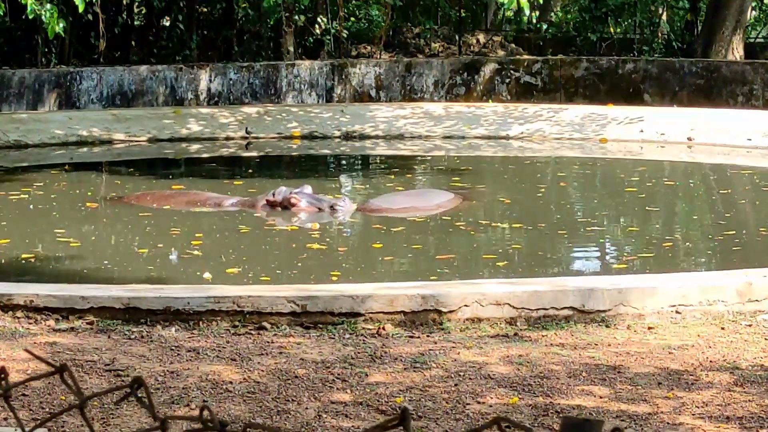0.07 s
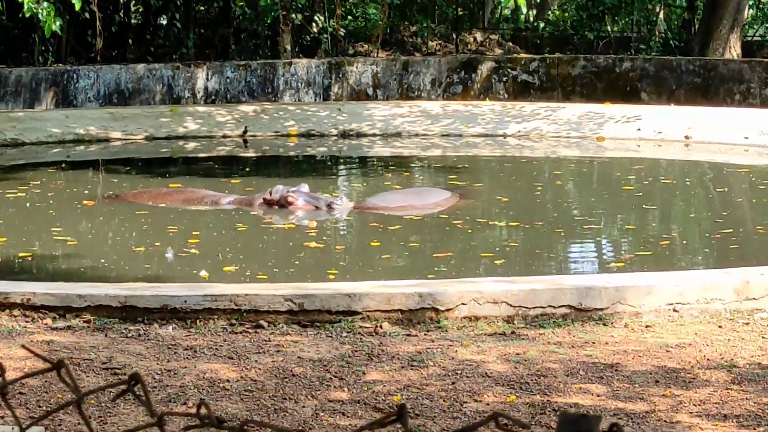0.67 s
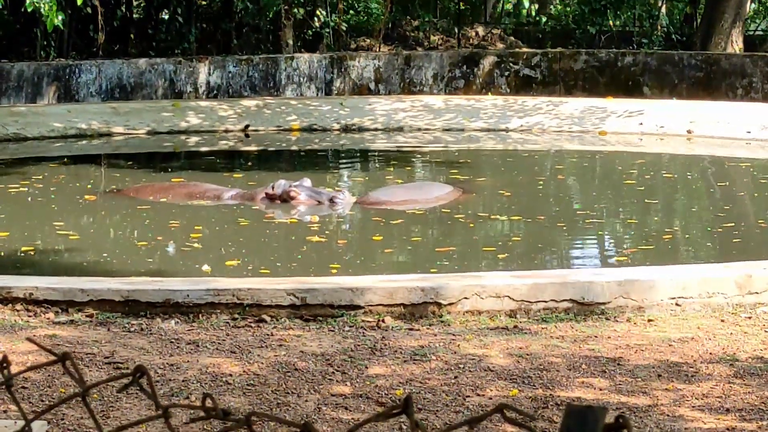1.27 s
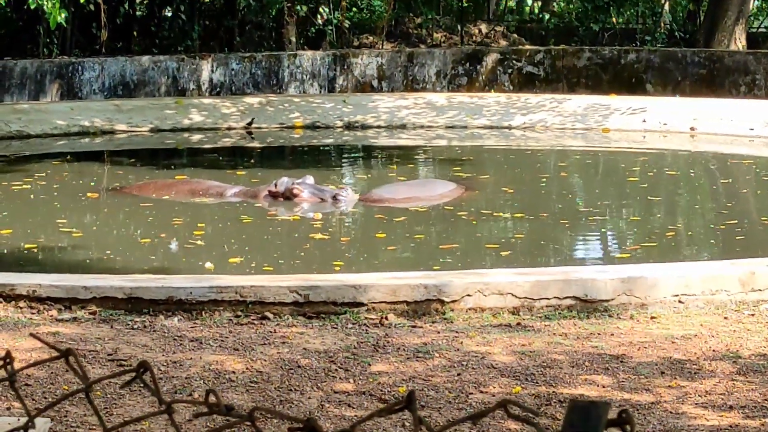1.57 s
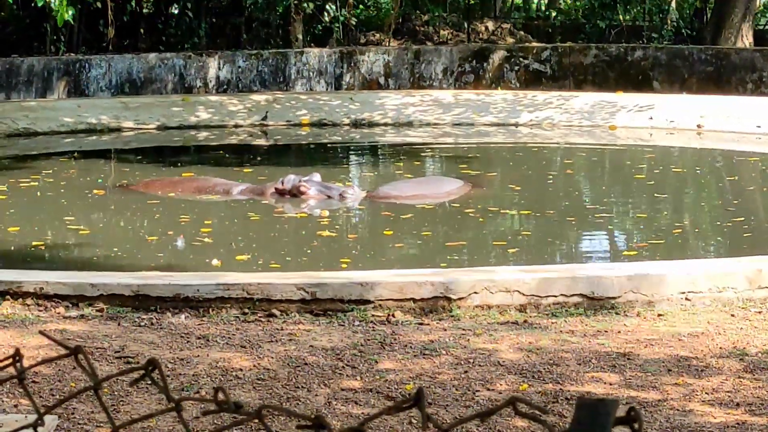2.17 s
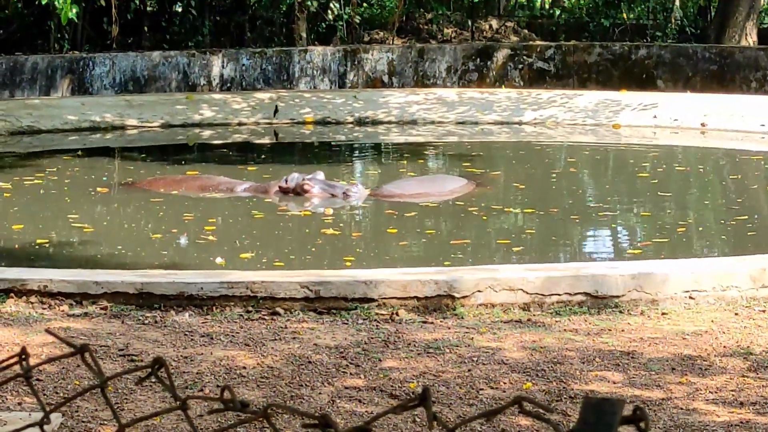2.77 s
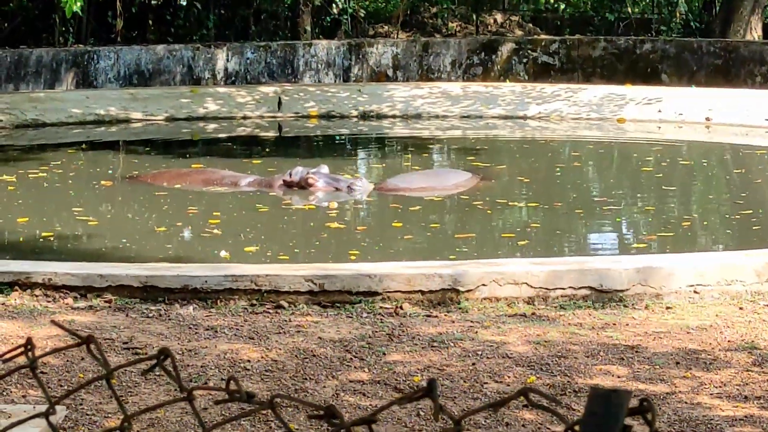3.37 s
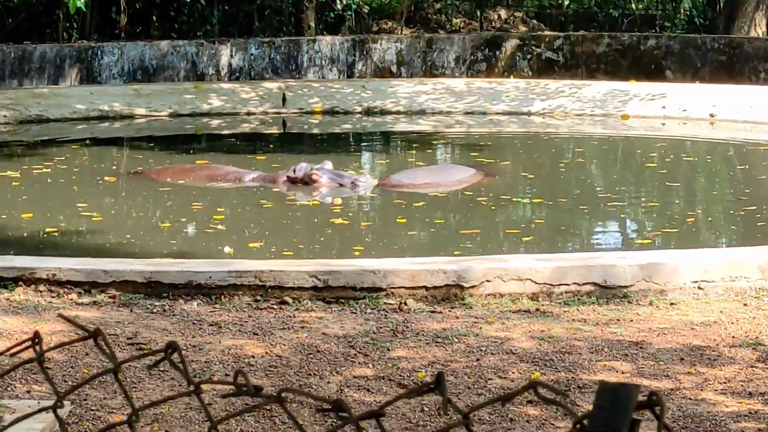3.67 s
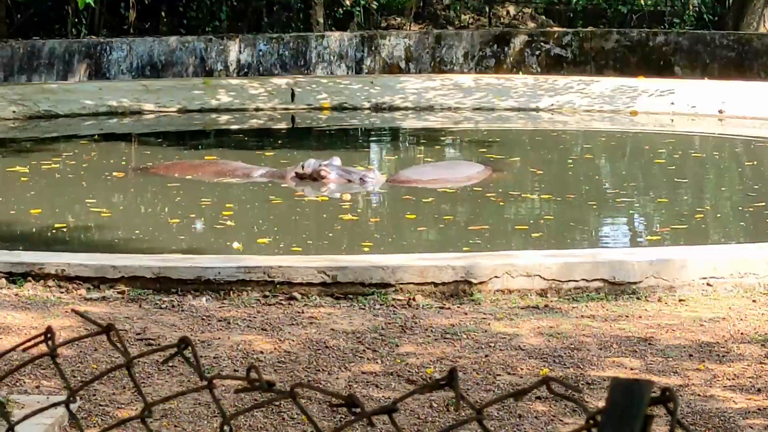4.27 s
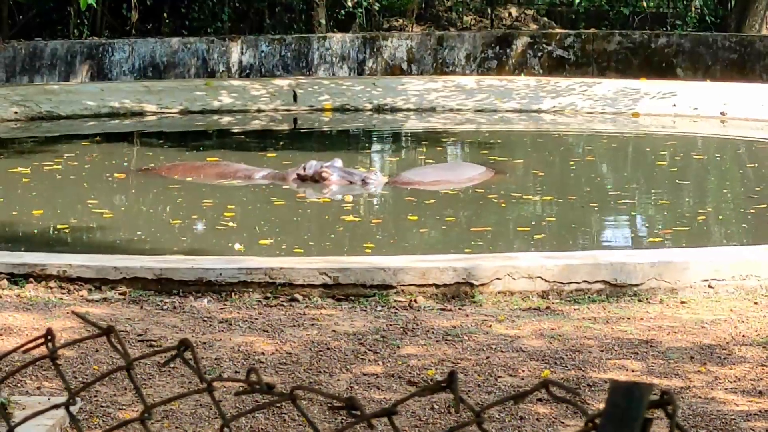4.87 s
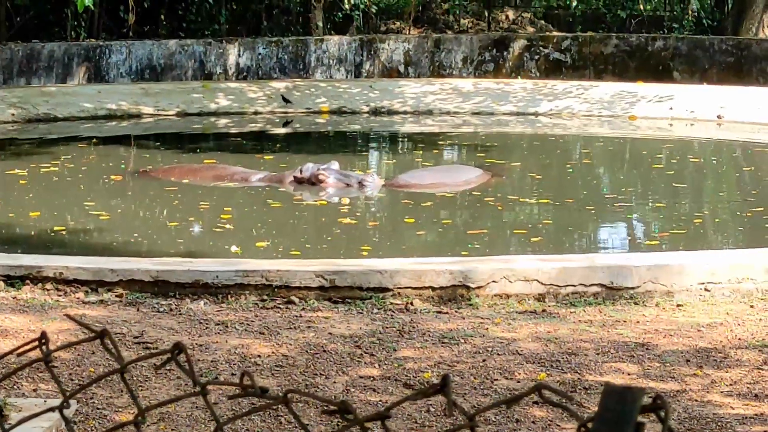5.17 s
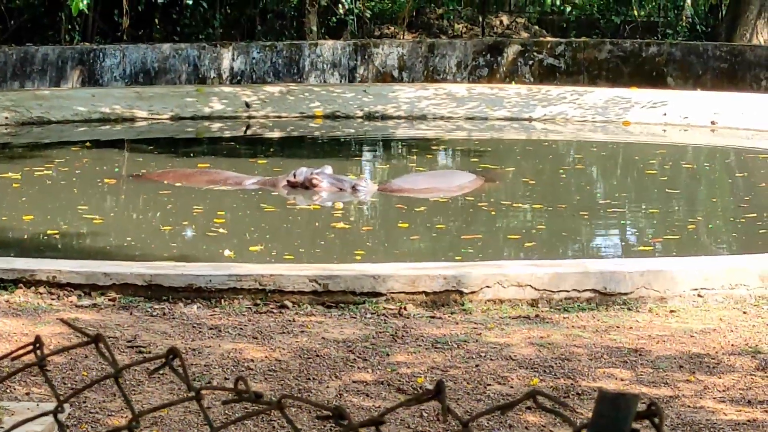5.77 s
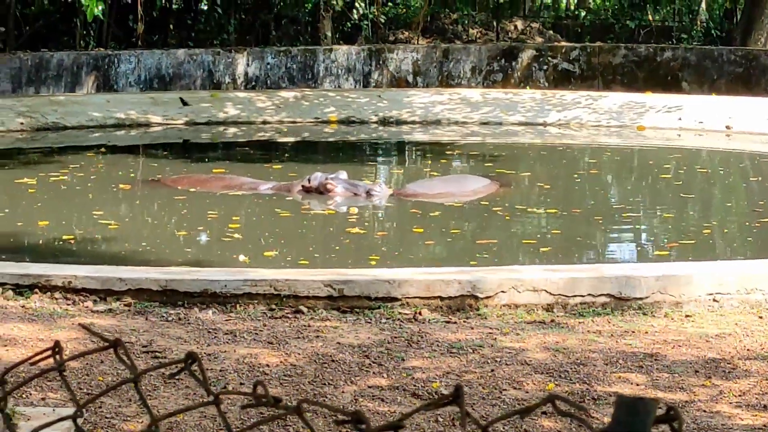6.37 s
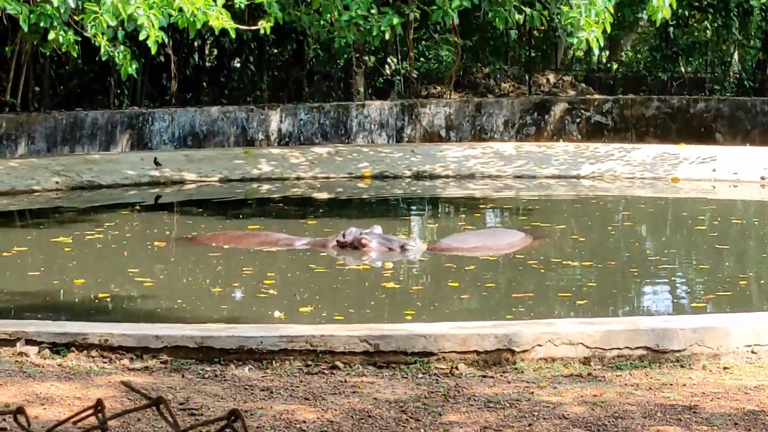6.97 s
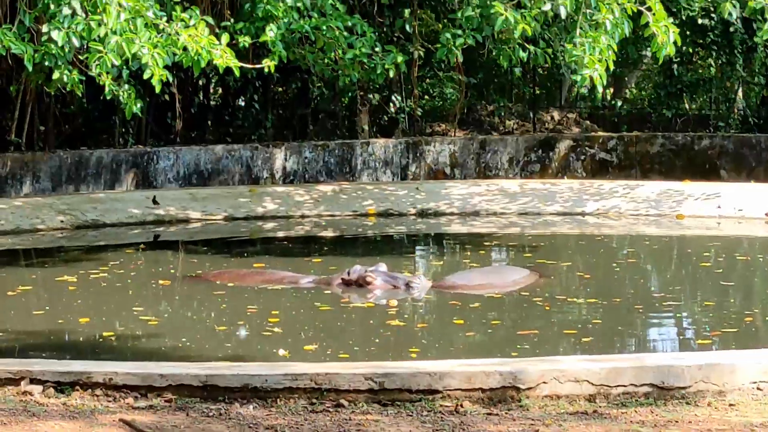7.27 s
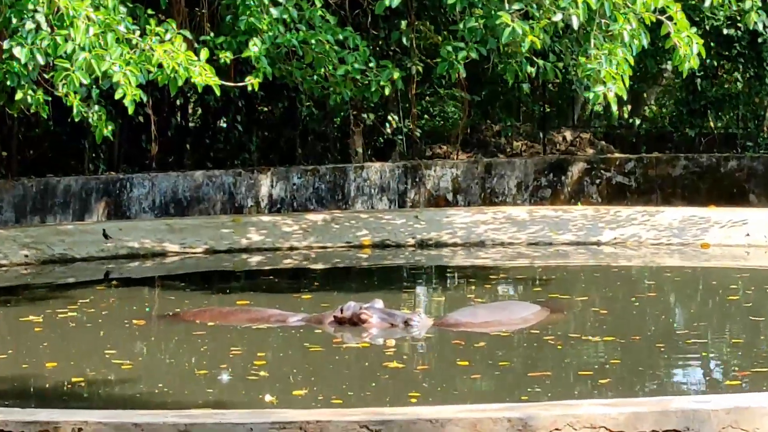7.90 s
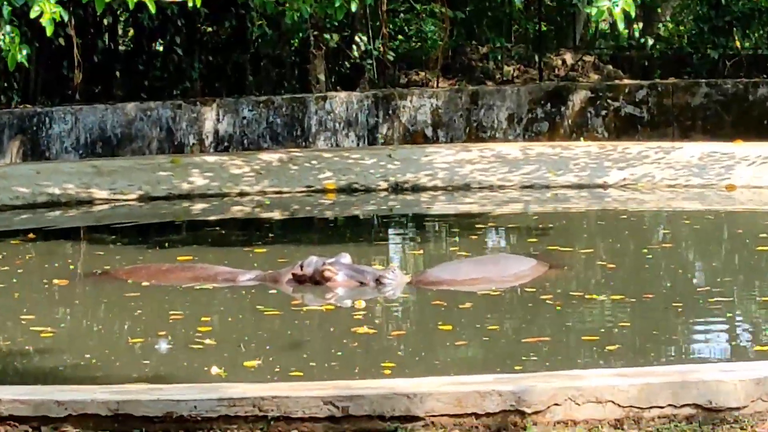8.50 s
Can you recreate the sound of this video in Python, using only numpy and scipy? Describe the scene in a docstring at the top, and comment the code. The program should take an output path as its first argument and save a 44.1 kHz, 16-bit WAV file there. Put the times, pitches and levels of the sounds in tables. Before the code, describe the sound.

Outdoors among trees, a distant engine hums under a light hiss. A far bird whistles short, echoing phrases on the right, with faint high chirps and an occasional crow-like caw. Midway, a small bird trills quickly on the left. Near the end, a songbird close to the microphone scolds, squawks and squeaks, then breaks into loud, fast chatter that dominates everything else.

```python
"""Birds around a walled pool

Over a distant engine and faint chirps, a far bird whistles short phrases, a small one trills and a
crow-like caw comes now and then; then a near songbird scolds and breaks into loud, fast chatter.
Each whistle is a gliding tone of the syrinx, roughened by modulation; caws and engine hum are harmonic
series shaped by resonance. Outdoors, trees and walls scatter every note into reverberation."""
import sys
import numpy as np
from scipy import signal
from scipy.fft import rfft, irfft
from scipy.io import wavfile
from scipy.ndimage import uniform_filter1d

SR = 44100
rng = np.random.default_rng(int(sys.argv[2]) if len(sys.argv) > 2 else 0)


def put_to_file(sound):
    """Save the sound as 16-bit audio at rate SR, in the file named by the first command-line argument."""
    columns = np.atleast_2d(sound).T  # one column per channel
    safe = np.clip(columns, -1, 1)
    whole_steps = np.round(safe * 32767)
    wavfile.write(sys.argv[1], SR, whole_steps.astype(np.int16))


N = 385434
RUMBLE_DB, HISS_DB = -47, -51
BAND_LIMIT_HZ = 15850

# Levels in the tables are relative; rasp is a depth of modulation, from 0 (pure) to 1 (harsh).
# Far-off rumble: (frequency [Hz], spectral density [dB])
RUMBLE_SPECTRUM = [(15, -57), (25, -34), (54, -15.5), (91, -0.5), (108, 0), (174, -4.5), (211, -8),
                   (270, -13), (344, -16.5), (400, -43), (520, -39), (880, -120)]
# Outdoor hiss: (frequency [Hz], spectral density [dB])
HISS_SPECTRUM = [(180, -8.5), (300, -7), (342, -0.5), (611, -7), (956, -8.5), (1710, -13.5), (2460, -12),
                 (4170, -12.5), (4770, -8), (6310, -15.5), (9550, -18), (14900, -16), (15700, -18.5)]
# Likeness of the noise on the two sides: (frequency [Hz], correlation [-1 to 1])
NOISE_CORRELATION = [(60, 0.96), (130, 0.59), (290, 0.39), (640, 0.25), (1410, 0.11), (3100, -0.24),
                     (6820, -0.11), (15000, 0.07)]
# Balance of the noise: (frequency [Hz], left over right [dB])
NOISE_BALANCE = [(60, -11), (110, -6), (200, -1.5), (380, -2), (700, -0.5), (1290, -0.5), (2380, 1.5),
                 (4400, -0.5), (8120, 0.5), (15000, 0.5)]
# Decay among trees and walls: (frequency [Hz], reverberation time [s])
GROVE_T60 = [(1000, 0.36), (3000, 1.43), (5000, 1.03), (7400, 1.38), (14000, .3)]
# The engine speeds up and eases off: (time [s], speed [rev/s])
ENGINE_SPEED = [(0, 20.8), (1.2, 23.2), (1.999, 22), (2.801, 25.4), (3.4, 27.3), (4.4, 23.9), (5.199, 26),
                (6, 28.7), (7, 28), (7.9, 29), (8.35, 27), (8.74, 24)]
# Exhaust resonance: (frequency [Hz], level of a harmonic [dB])
EXHAUST_RESPONSE = [(70, -67.5), (88, -60), (105, -48), (135, -57), (170, -58.5), (220, -63.5)]
# Repeated notes, by name:
# (duration [s], peak position [0-1], swell [0 flat, 1 peaked], pitches at even steps [Hz])
SYLLABLE_SHAPES = { "chak": (.052, 0.25, .08, [4080, 4250, 3290, 3416, 2936, 2900, 2855, 3070, 2800]),
                   "rise": (.042, 0.72, 0.64, [3430, 3730, 4220, 3470, 4183, 4220, 4630, 4760, 4620]),
                   "slur": (.032, 0.59, 0.82, [6070, 5160, 5810, 4720, 5204, 4285, 4034, 3650, 3270]),
                   "arch": (.035, 0.32, 0.97, [3190, 3796, 3745, 3320, 2854, 2380]),
                   "hook": (.039, 0.73, .8, [2580, 2384, 2710, 2297, 2717, 3084, 3120, 2020]),
                   "dip": (0.023, 0.32, 1, [3820, 3534, 3050, 2660, 2380]),
                   "lift": (0.0329, 0.68, 0.82, [3410, 3790, 4016, 4234, 4370]),
                   "trill": (.033, .5, 0.23, [6205, 6060, 5580, 5026, 4550, 6480, 7700]),
                   "pip": (0.017, .55, .8, [5660, 5910, 5900, 5670]),
                   "tsip": (0.0217, 0.58, 0.69, [5250, 4820, 4620, 4350])}
# Bouts of triple pips and tsips: (start [s], end [s], period [s], level [dB], syllable [name])
CHIRP_BOUTS = [(.186, .6, 0.3, -55.5, "pip"), (.863, 1.95, .31, -55.5, "pip"),
               (2.42, 4.4, .302, -55.5, "pip"), (6.428, 6.6, .302, -57, "pip"),
               (.05, 4.5, .33, -57.5, "tsip"), (6.461, 6.6, .33, -58, "tsip")]
# Far caws: (time [s], duration [s], pitch [Hz], level [dB])
CAW_NOTES = [(2.677, 0.13, 624, -52.5), (3.25, 0.09, 624, -52.5), (3.964, 0.13, 629, -54),
             (4.581, 0.15, 606.6, -61), (5.532, .13, 638, -52), (5.78, 0.081, 716, -65),
             (6.961, 0.1, 623, -47.5)]
# Throat resonance of the cawing bird: (frequency [Hz], gain [dB])
CAW_FORMANTS = [(600, -31), (1230, -13), (1850, -12.5), (2480, 0), (3100, -16), (4000, -19)]
# Envelope of the small bird's trill: (time [s], level [dB])
TRILL_LEVELS = [(4.42, -54), (4.55, -46), (4.7, -43.5), (5.3, -43.5), (5.8, -44), (6.16, -43.5)]
# Far whistles: (time [s], duration [s], start [Hz], middle [Hz], end [Hz], level [dB], rasp [0-1])
FAR_WHISTLES = [(0.251, .095, 4520, 4600, 4480, -52, 0.23), (0.873, 0.0425, 3340, 2886, 3700, -44, .12),
                (.906, 0.055, 3285, 4680, 5600, -45.5, .25), (0.966, .064, 5600, 5280, 4350, -51, .2),
                (2.013, 0.055, 3620, 3770, 3970, -48, 0.32), (2.279, .06, 2700, 3410, 4980, -44, .15),
                (2.358, .031, 2450, 2334, 2320, -46, 0.27), (2.375, 0.043, 7200, 7540, 7450, -46.5, .3),
                (2.599, .04, 7200, 7460, 7280, -48.5, 0.27), (3.343, 0.083, 3703, 3990, 4150, -45.5, 0.08),
                (4.736, 0.056, 4220, 4430, 4300, -48.5, 0.36)]
# Far warbles: (time [s], duration [s], first centre [Hz], last centre [Hz], swing rate [Hz],
# swing [share of pitch], level [dB], peak position [0-1], rasp [0-1])
FAR_WARBLES = [(0, 0.12, 2500, 2804, 22, .11, -47, 0.32, 0.27),
               (0.137, 0.21, 3870, 3820, 17, .24, -49.5, 0.6, 0.4),
               (1.029, .17, 3150, 3404, 11.5, .21, -42, 0.69, 0.23),
               (1.87, 0.17, 2305, 2250, 19, .09, -58.5, .5, 0.44),
               (2.09, .175, 3350, 2698, 20.2, .16, -41.5, 0.2, 0.18),
               (3.07, 0.15, 4080, 5000, 15, .15, -47.5, .6, 0.38),
               (3.229, 0.14, 3400, 3150, 13.5, .22, -42, 0.62, .3),
               (4.082, 0.19, 3760, 3160, 17.6, .12, -48, 0.58, 0.4),
               (4.739, .13, 2756, 3180, 10, .2, -46.5, 0.81, .18),
               (4.895, 0.17, 2847, 3455, 21, 0.131, -47, .55, .4),
               (5.033, .24, 2894, 2442, 17, .09, -52, 0.47, .35),
               (5.918, 0.079, 4100, 4000, 15, .13, -54, 0.51, 0.34),
               (6.052, 0.16, 3065, 3150, 8, .17, -49, 0.66, .42)]
# Near scolds: (time [s], level [dB], rasp [0-1])
NEAR_SCOLDS = [(6.567, -42, .9), (6.679, -37.5, .7), (6.781, -36, 0.45)]
# Two-voiced squawks: (time [s], duration [s], start [Hz], middle [Hz], end [Hz], level [dB],
# pitch of the second voice [ratio], final rasp [0-1])
NEAR_SQUAWKS = [(6.874, 0.027, 4720, 7000, 6200, -39.5, .68, 0.6),
                (6.892, 0.046, 5800, 4910, 4740, -38, 1.55, 0.7),
                (6.963, 0.045, 7000, 7600, 7575, -40, 0.51, 0.8),
                (7.074, .038, 6900, 6030, 5560, -37, 0.63, 0.9),
                (7.223, 0.049, 7900, 7380, 6150, -34, 0.68, 1),
                (7.277, .041, 7800, 7340, 6100, -33.5, .67, 1),
                (7.403, 0.07, 2900, 4260, 3510, -36, .75, .5)]
# Near squeaks: (time [s], duration [s], start [Hz], middle [Hz], end [Hz], level [dB], rasp [0-1])
NEAR_SQUEAKS = [(7.044, 0.0076, 9200, 6300, 3800, -36, .9), (7.096, .024, 3900, 3490, 2950, -36, 0.33),
                (7.146, 0.043, 3420, 4110, 5000, -34.5, 1), (7.344, 0.015, 4360, 3630, 3640, -31.5, 0.64),
                (7.357, .02, 3470, 3144, 2600, -31, 0.23), (7.491, 0.0214, 3750, 3540, 2790, -29, .25),
                (7.547, 0.045, 9000, 7400, 6800, -34.5, 0.4), (7.575, 0.02, 6880, 6230, 4950, -23.5, .25),
                (7.622, .016, 5600, 6820, 6900, -24, .24), (7.643, .025, 4906, 5800, 3900, -24.5, .35),
                (7.769, .024, 8930, 6280, 4400, -27, 0.4)]
# Notes of each chatter motif, by name: (offset [s], level [dB], rasp [0-1], syllable [name])
CHATTER_MOTIFS = {"wheet": [(0, -18, 0.04, "rise")], "tee-chu": [(0, -17, 0.1, "slur"),
                  (.036, -19.5, 0.03, "arch")], "to-ri-weet": [(0, -25, 0.04, "hook"),
                  (.0577, -25, 0.02, "dip"), (.083, -14.5, .02, "lift")]}
# Runs of a motif: (start [s], repeats [count], period [s], change per repeat [dB], motif [name])
NEAR_CHATTER_RUNS = [(7.687, 2, .121, 1, "wheet"), (7.881, 4, .1043, 0, "tee-chu"),
                     (8.2933, 3, .146, -0.94, "to-ri-weet")]


def gain_of(db):
    """Amplitude grows tenfold for every 20 dB."""
    return 10 ** (np.asarray(db) / 20)


def unit_rms(x):
    """Normalisation to a mean power of one."""
    return x / np.sqrt(np.mean(x ** 2) + 1e-20)


def value_at(points, hz):
    """Interpolation on a logarithmic frequency axis."""
    f, value = np.transpose(points)
    return np.interp(np.log(hz + 1), np.log(f + 1), value)


def waver(size, hz):
    """Low-pass filtering turns white noise into a smooth fluctuation of unit rms."""
    low = signal.butter(2, min(hz, SR / 4), fs=SR, output="sos")
    return unit_rms(signal.sosfilt(low, rng.standard_normal(size + 2048)))[-size:]


def gather(notes):
    """Superposition: (time, sound) pairs add on one track."""
    track = np.zeros(N)
    for s, sound in notes:
        part = track[max(round(s * SR), 0):][:len(sound)]
        part += sound[:len(part)]
    return track


def grove(x, build_s):
    """Scattering by trunks, leaves and walls: a dense echo builds up, then lingers from 3 to 7 kHz."""
    taps = rng.standard_normal((2, SR)) * (rng.random((2, SR)) < 3000 / SR)
    hz, t, spectra = signal.stft(taps, SR, nperseg=256)
    decay = gain_of(-60 * t / value_at(GROVE_T60, hz)[:, None])
    tail = signal.istft(spectra * decay * (1 - np.exp(-t / build_s)), SR, nperseg=256)[1]
    song_band = signal.butter(2, [2500, 5500], "band", fs=SR, output="sos")
    band_gain = np.linalg.norm(signal.sosfilt(song_band, tail), axis=1, keepdims=True)
    tail /= band_gain * np.sqrt(SR / 6000)  # unit power gain in the song band
    return signal.fftconvolve(x[None], tail, axes=1)[:, :N]


def place(x, pan_db, lead_ms, direct_db, echo_db, build_s):
    """Level and time differences (positive favours the left) locate a source; its echo is diffuse."""
    hz = np.fft.rfftfreq(N, 1 / SR)
    right = irfft(rfft(x) * np.exp(-2j * np.pi * hz * lead_ms / 1000), N)
    direct = np.array([x * gain_of(pan_db / 2), right * gain_of(-pan_db / 2)])
    return gain_of(direct_db) * direct + gain_of(echo_db) * grove(x, build_s)


def outdoor_noise(spectrum, patchy_db):
    """Partial coherence: noise with drifting spectral patches, alike on both sides only in the bass."""
    frames, hz = N // 1024 + 5, np.fft.rfftfreq(4096, 1 / SR)
    a, b, c, d, patches = rng.standard_normal((5, frames, len(hz)))
    patches = unit_rms(uniform_filter1d(uniform_filter1d(patches, size=7, axis=0), size=40, axis=1))
    correlation = value_at(NOISE_CORRELATION, hz)
    left = a + 1j * b
    right = correlation * left + np.sqrt(1 - correlation ** 2) * (c + 1j * d)
    lean = gain_of(value_at(NOISE_BALANCE, hz) / 2)
    spectra = np.array([left * lean, right / lean])
    spectra *= gain_of(value_at(spectrum, hz) + patchy_db * patches)
    return unit_rms(signal.istft(spectra.swapaxes(1, 2), nperseg=4096, noverlap=3072)[1][:, :N])


def engine(unsteady=0.22):
    """Harmonics 3 to 7 of the rotation rate glide through the resonance of the exhaust."""
    speed = np.interp(np.arange(N) / SR, *np.transpose(ENGINE_SPEED)) * (1 + 0.0062 * waver(N, 4.4))
    phase = 2 * np.pi * np.cumsum(speed) / SR
    hum = np.zeros(N)
    for k in range(3, 8):
        harmonic = np.sin(k * phase + 2 * np.pi * rng.random()) * (1 + unsteady * waver(N, 5.5))
        hum += gain_of(value_at(EXHAUST_RESPONSE, k * speed)) * unit_rms(harmonic)
    return hum * gain_of([[-2.4], [2.0]])  # left, right


def background():
    """Continuous spectra of rumble and hiss surround the line spectrum of the distant engine."""
    rumble = gain_of(RUMBLE_DB) * outdoor_noise(RUMBLE_SPECTRUM, patchy_db=0.17)
    return rumble + engine() + gain_of(HISS_DB) * outdoor_noise(HISS_SPECTRUM, patchy_db=1.0)


def rough_tone(hz, rasp, jitter=0.0047, overtone_db=-39, rasp_hz=800, buzz_hz=720, buzz=0.51):
    """Modulation adds sidebands to a tone, as when one side of a syrinx buzzes against the other."""
    size = len(hz)
    phase = 2 * np.pi * np.cumsum(hz * (1 + jitter * waver(size, 162.4))) / SR
    buzz_phase = 2 * np.pi * np.cumsum(buzz_hz * (1 + 0.085 * waver(size, 200))) / SR
    noise = waver(size, rasp_hz) + 1j * waver(size, rasp_hz)
    modulation = 0.77 * noise + buzz * (np.cos(buzz_phase) + 0.37 * np.cos(2 * buzz_phase))
    tone = (np.exp(1j * phase) * (1 + rasp * modulation)).real / np.sqrt(1 + 2 * rasp ** 2)
    return tone + gain_of(overtone_db) * np.sin(2 * phase)


def syllable(s, db, pitch_ratio, rasp, name):
    """A tone follows a frequency contour under an envelope that swells and dies."""
    length, peak, swell, path = SYLLABLE_SHAPES[name]
    u = np.linspace(0, 1, int(length * SR))
    glide = uniform_filter1d(np.interp(u, np.linspace(0, 1, len(path)), path), size=90) * pitch_ratio
    skewed = u ** (np.log(.5) / np.log(peak))  # reaches one half at the peak
    return s, gain_of(db) * abs(np.sin(np.pi * skewed)) ** swell * rough_tone(glide, rasp)


def bent_note(s, length, start_hz, middle_hz, end_hz, db, rasp, jitter=0.0085):
    """A parabolic glide through three frequencies, tapered at both ends."""
    u = np.linspace(0, 1, max(int(length * SR), 64))
    hz = np.polyval(np.polyfit([0, .5, 1], [start_hz, middle_hz, end_hz], 2), u)
    tone = rough_tone(hz, rasp, jitter, overtone_db=-27)
    return s, gain_of(db) * tone * signal.windows.tukey(len(u), .55)


def triple_chirps(spacing_s=.043, uneven_db=2.0, uneven_pitch=0.0072):
    """Pulse trains in threes: faint pips (insect or small bird) and the trilling bird's falling tsips."""
    pulses = [(s + k * spacing_s, db, name) for start, end, period, db, name in CHIRP_BOUTS
              for s in np.arange(start, end, period) for k in range(3)]
    chance = rng.standard_normal((len(pulses), 2))
    voice = gather(syllable(s, db + uneven_db * a, 1 + uneven_pitch * b, .06, name)
                   for (s, db, name), (a, b) in zip(pulses, chance))
    return place(voice, pan_db=-6.0, lead_ms=0, direct_db=1.5, echo_db=1.5, build_s=0.0066)


def caws(sag=0.238, hoarse=0.03):
    """Source and filter: throat formants make six harmonics nasal as their pitch arches and sags."""
    notes = []
    for s, length, hz, db in CAW_NOTES:
        u = np.linspace(0, 1, int(length * SR))
        pitch = hz * (1 - sag * (u - .3) ** 2 + hoarse * waver(len(u), 210))
        phase = 2 * np.pi * np.cumsum(pitch) / SR
        stack = sum(gain_of(value_at(CAW_FORMANTS, k * hz)) * np.sin(k * phase) for k in range(1, 7))
        notes.append((s, gain_of(db) * stack * signal.windows.tukey(len(u), .4)))
    return place(gather(notes), pan_db=-7, lead_ms=0, direct_db=-0.5, echo_db=-0.5, build_s=0.0045)


def trill(count=34, uneven_db=1.5):
    """V-shaped frequency sweeps repeat about twenty times a second, their period slowly lengthening."""
    k = np.arange(count)
    times = 4.421 + .0485 * k + .000115 * k ** 2
    chance = rng.standard_normal((count, 2))
    levels = np.interp(times, *np.transpose(TRILL_LEVELS)) + uneven_db * chance[:, 0]
    pitches = 1 + 0.00711 * chance[:, 1]
    voice = gather(syllable(*note, 0.25, "trill") for note in zip(times, levels, pitches))
    return place(voice, pan_db=5.5, lead_ms=-0.0096, direct_db=-5.0, echo_db=-2.0, build_s=0.004)


def warble(s, length, start_hz, end_hz, swing_hz, swing, db, peak, rasp, falloff_db=11, thin_db=3):
    """Triangular frequency modulation about a drifting centre; the tone weakens on each upswing."""
    t = np.arange(0, length, 1 / SR)
    zigzag = signal.sawtooth(2 * np.pi * swing_hz * t + np.pi, .5)
    hz = np.geomspace(start_hz, end_hz, len(t)) * (1 + swing * zigzag)
    level_db = db - falloff_db * abs(t / length - peak) - thin_db * zigzag
    envelope = gain_of(level_db) * signal.windows.tukey(len(t), .2)
    return s, envelope * rough_tone(hz, rasp, jitter=.4 * rasp ** 2, overtone_db=-27)


def far_bird(wobble=0.47):
    """Reverberation outweighs the direct sound of phrases on the right; pitch jitter grows with rasp."""
    whistles = [bent_note(*row, jitter=0.0033 + wobble * row[-1] ** 2) for row in FAR_WHISTLES]
    voice = gather(whistles + [warble(*row) for row in FAR_WARBLES])
    return place(voice, pan_db=-8.5, lead_ms=0.085, direct_db=-1.0, echo_db=3.5, build_s=0.0033)


def scold(s, db, rasp, grain=0.31, grain_hz=260):
    """Random amplitude modulation makes a harsh chak sputter."""
    s, note = syllable(s, db, 1, rasp, "chak")
    return s, note * unit_rms(np.exp(grain * waver(len(note), grain_hz)))


def squawk(s, length, start_hz, middle_hz, end_hz, db, ratio, end_rasp, start_rasp=0.33, second_db=-4):
    """Biphonation: the two sides of the syrinx sound one bend at different pitches, ever harsher."""
    bend = np.array([start_hz, middle_hz, end_hz])
    rasp = np.linspace(start_rasp, end_rasp, int(length * SR))
    _, first = bent_note(s, length, *bend, db, rasp)
    _, second = bent_note(s, length, *bend * ratio, db + second_db, rasp)
    return s, first + second


def squeak(row, swell_db=3):
    """An exponential rise in amplitude weights a bent note towards its end."""
    s, note = bent_note(*row)
    return s, note * gain_of(swell_db * np.linspace(-.5, .5, len(note)))


def chatter(uneven_pitch=.008):
    """Periodic repetition of motifs, with a small random pitch shift on every note."""
    notes = []
    for start, repeats, period, change_db, motif in NEAR_CHATTER_RUNS:
        for k in range(round(repeats)):
            for offset, db, rasp, name in CHATTER_MOTIFS[motif]:
                pitch = 1 + uneven_pitch * rng.standard_normal()
                notes.append(syllable(start + k * period + offset, db + k * change_db, pitch, rasp, name))
    return notes


def ground_reflections(x, delays_s, levels_db):
    """Comb filtering: delayed copies interfere with the direct sound, so that glides flutter."""
    hz = np.fft.rfftfreq(N, 1 / SR)
    comb = 1 + sum(gain_of(db) * np.exp(-2j * np.pi * hz * s) for s, db in zip(delays_s, levels_db))
    return irfft(rfft(x) * comb, N)


def near_bird():
    """Direct sound dominates at close range: scolds, squawks and squeaks, then the loud chatter."""
    scolds = [scold(*row) for row in NEAR_SCOLDS]
    squawks = [squawk(*row) for row in NEAR_SQUAWKS]
    squeaks = [squeak(row) for row in NEAR_SQUEAKS]
    voice = gather(scolds + squawks + squeaks + chatter())
    voice = ground_reflections(voice, delays_s=(.0019, .00392, .0085), levels_db=(-11, -18, -22))
    return place(voice, pan_db=-0.5, lead_ms=0.026, direct_db=-1.13, echo_db=-7.5, build_s=0.0012)


def scene():
    """Superposition: the sound pressures of all the calls and the background add."""
    return near_bird() + far_bird() + caws() + trill() + triple_chirps() + background()


def record(dry):
    """Band limiting: a linear-phase low-pass filter removes the highest treble."""
    low_pass = signal.firwin(711, BAND_LIMIT_HZ, window=("kaiser", 9), fs=SR)
    return signal.oaconvolve(dry, low_pass[None], "same")


dry = scene()
out = record(dry)
put_to_file(out)
```